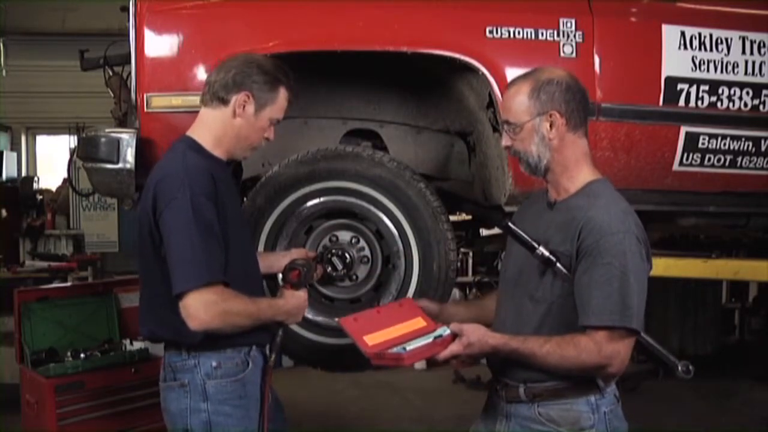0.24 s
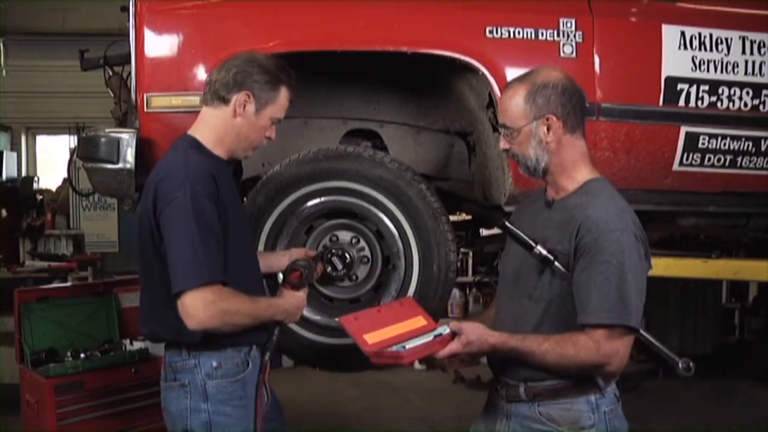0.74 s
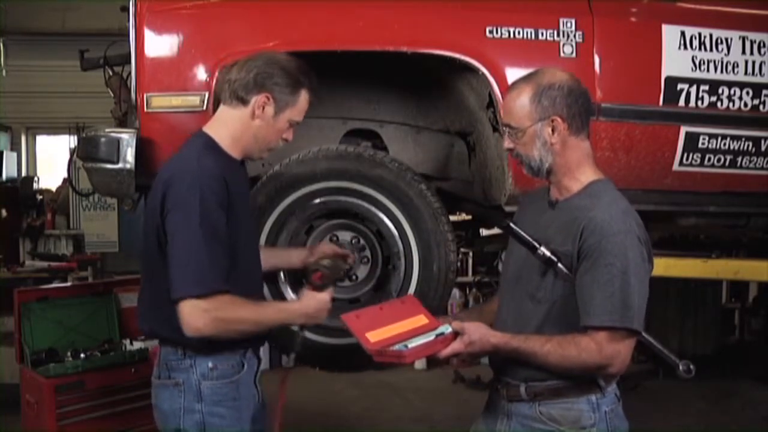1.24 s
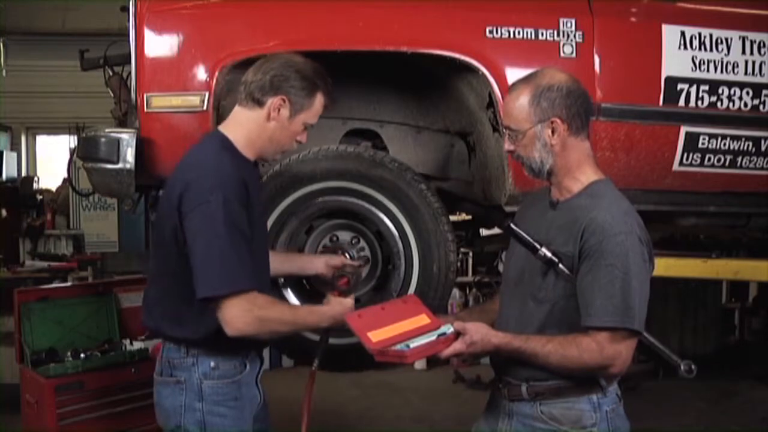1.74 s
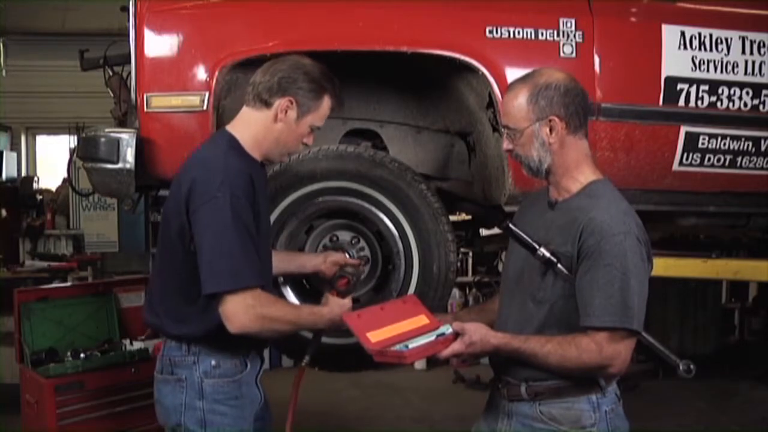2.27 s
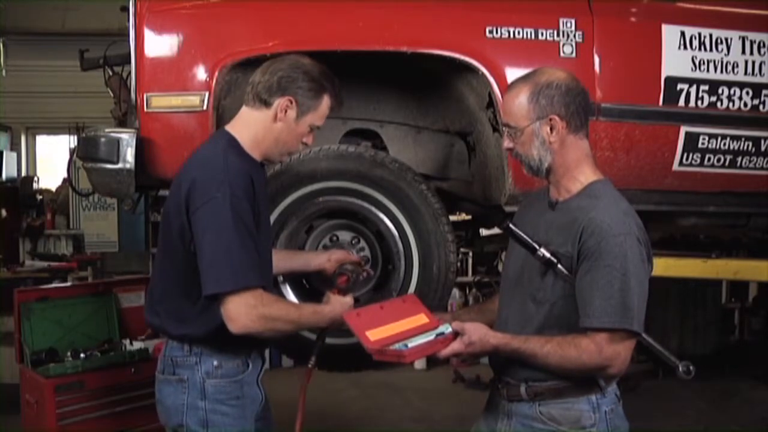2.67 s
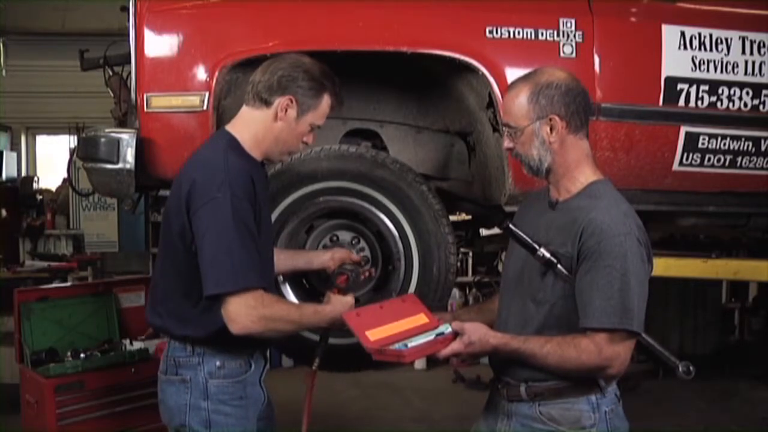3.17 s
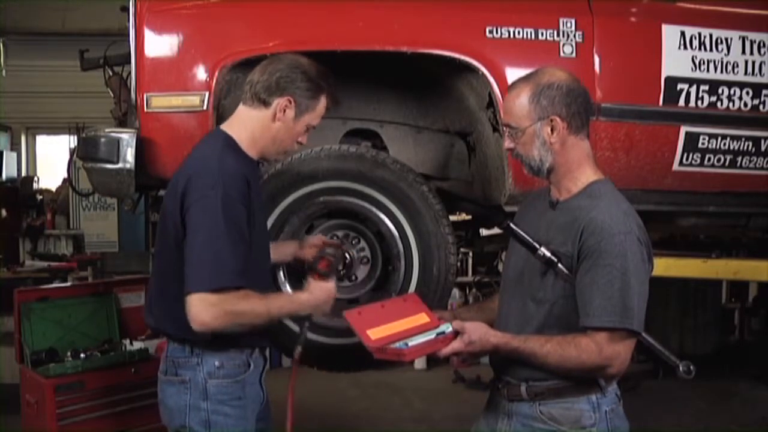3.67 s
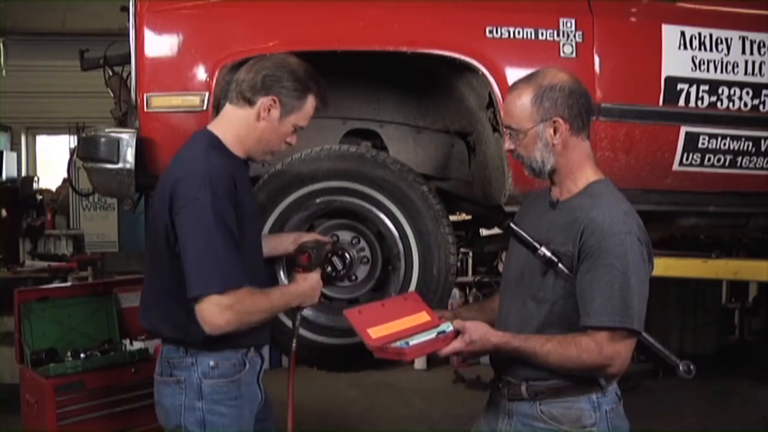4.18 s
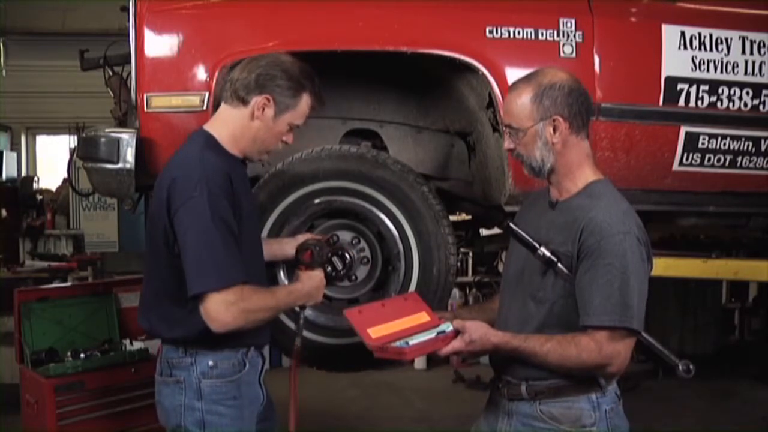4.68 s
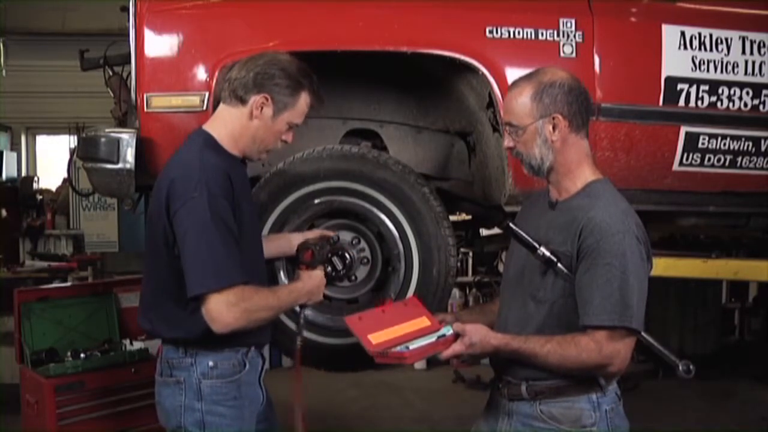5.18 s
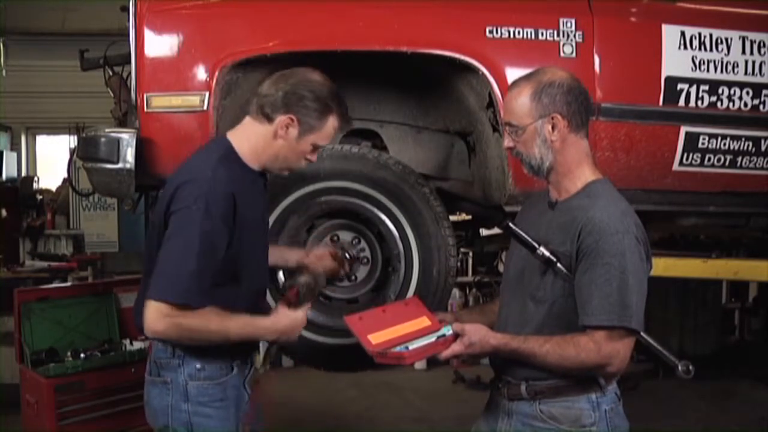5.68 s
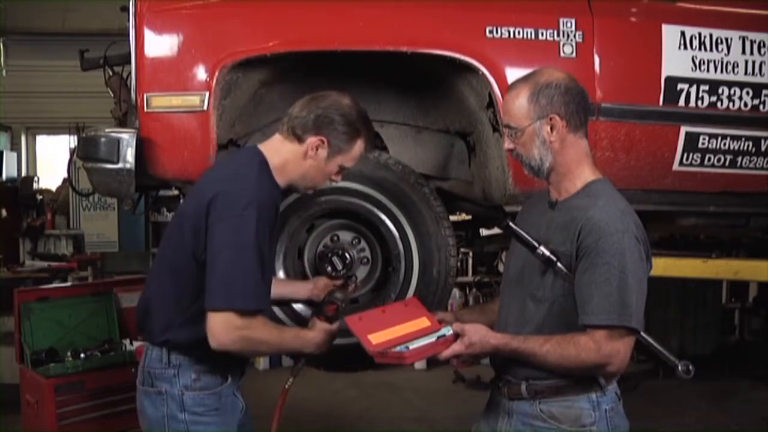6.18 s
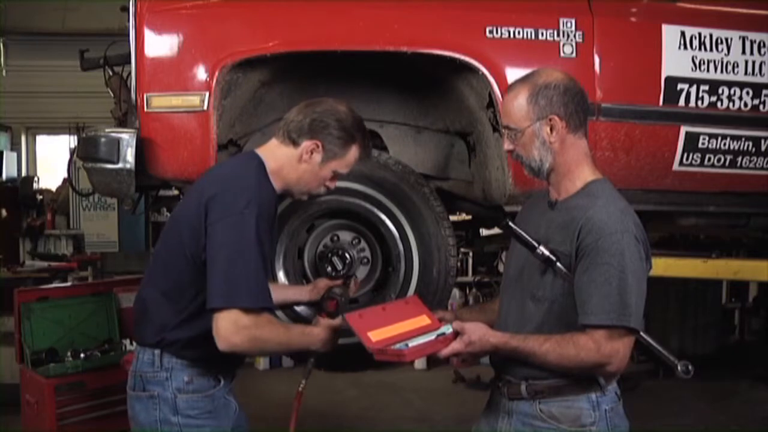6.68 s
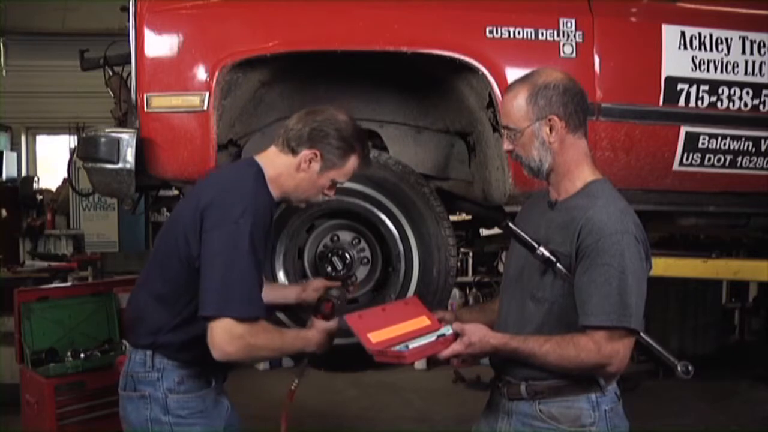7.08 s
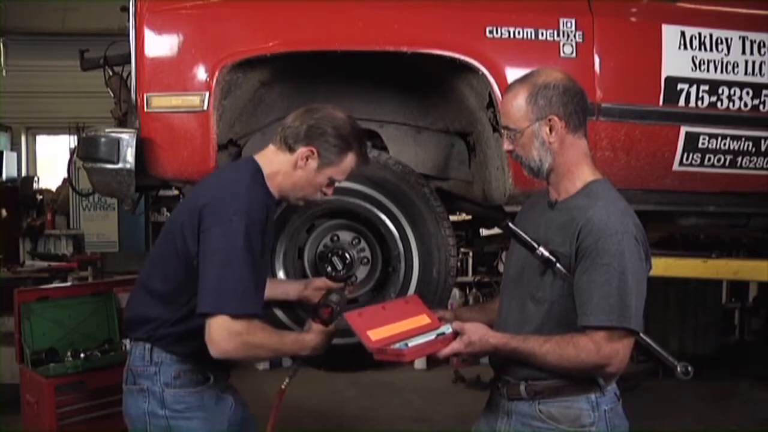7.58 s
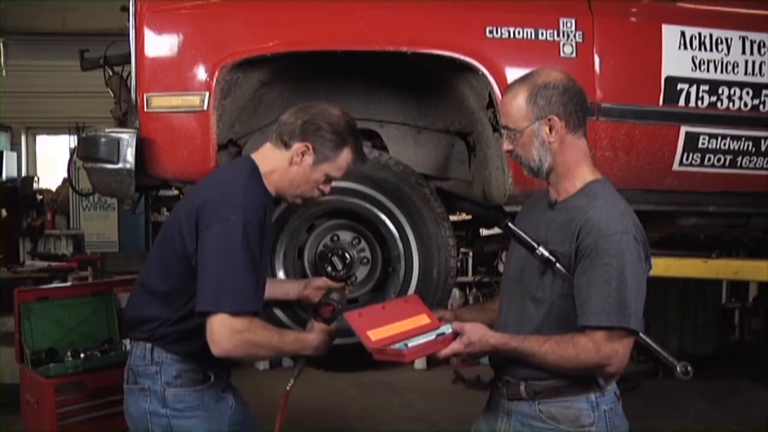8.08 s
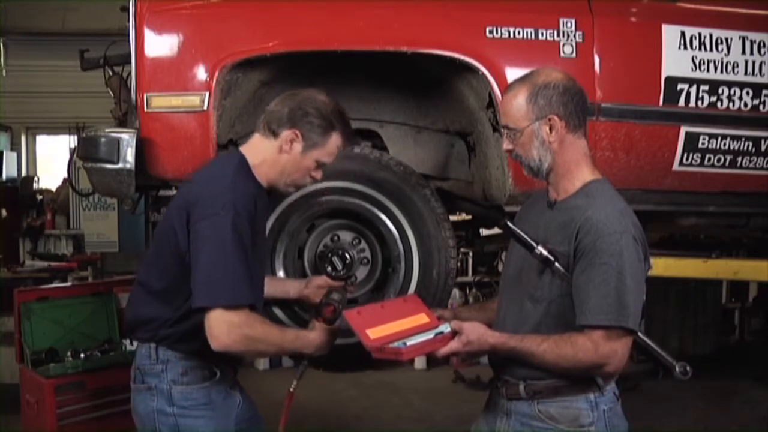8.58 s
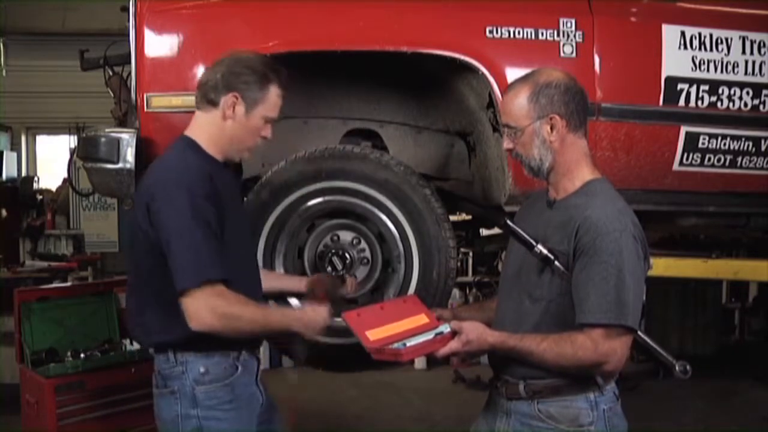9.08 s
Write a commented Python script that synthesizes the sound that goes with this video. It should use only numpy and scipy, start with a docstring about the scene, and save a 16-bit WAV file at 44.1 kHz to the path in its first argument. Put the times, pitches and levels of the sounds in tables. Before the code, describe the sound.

Close up in an echoing workshop, an air impact wrench is already hammering on a steel wheel, then stops with loose clanks. Two more loud bursts follow, each with buzzing motor puffs and hissing air, separated by socket knocks on nuts and rim. After a nearly silent pause, a longer, brighter and hissier burst rattles, then a few light clicks.

```python
"""Impact wrench on a steel wheel

An air impact wrench tightens nuts on a steel wheel in four bursts, in a workshop. In every stroke the vane
motor puffs faster, the clutch catches, and the hammer strikes the anvil: noise cracks over decaying metal modes.
Shaped noise is the exhaust's hiss. Around and between bursts the socket knocks on nuts and rim, the brake drum rings
faintly, a lamp hums as a sine, low noise trails some knocks, faint rustling follows, and the hall answers with
decaying noise."""
import sys
import numpy as np
from scipy import signal
from scipy.fft import rfft, irfft, next_fast_len
from scipy.io import wavfile
from scipy.ndimage import uniform_filter1d, minimum_filter1d

SR = 44100
rng = np.random.default_rng(int(sys.argv[2]) if len(sys.argv) > 2 else 0)


def dump(signal):
    """Clip the signal to [-1, 1] and save it as 16-bit WAV at the path in sys.argv[1]."""
    limited = np.clip(np.atleast_2d(signal).T, -1, 1)
    pcm = np.round(limited * 32767).astype(np.int16)
    wavfile.write(sys.argv[1], SR, pcm)


N = 411453
TIME = np.arange(N) / SR
RING = np.arange(SR // 2) / SR  # time axis of one struck ring, s


def amp(db):
    """Decibels to gain."""
    return 10 ** (np.asarray(db) / 20)


def unit(x):
    """Scales a signal to rms 1."""
    return x / np.sqrt(np.mean(x ** 2) + 1e-20)


def along(points, hz):
    """Reads a curve of (Hz, value) points on a log frequency axis."""
    point_hz, values = np.transpose(points)
    return np.interp(np.log(hz + 1), np.log(point_hz + 1), values)


def filtered(x, response):
    """Multiplies the spectrum of x by a complex response of frequency."""
    size = next_fast_len(N + 2 * SR)
    spectrum = rfft(x, size) * response(np.fft.rfftfreq(size, 1 / SR))
    return irfft(spectrum, size)[:N]


def noise(spectrum):
    """Coloured noise of rms 1; only the shape of the spectrum counts."""
    return unit(filtered(rng.standard_normal(N), lambda hz: amp(along(spectrum, hz))))


def add(track, s, piece):
    """Lays a piece into a track at a time in seconds."""
    part = track[max(round(s * SR), 0):][:len(piece)]
    part += piece[:len(part)]


def contact(t60, rise):
    """Envelope of a rattling contact: a quick rise, then chatter that dies."""
    t = np.arange(SR // 8) / SR
    chatter_db = np.repeat(rng.normal(0, 3, len(t) // 32 + 1), 32)[:len(t)]
    decay_db = -60 * t / np.clip(t60, .003, .2)
    return (1 - np.exp(-t / rise)) * amp(chatter_db + decay_db)


# Modes of the socket. Each row: frequency in Hz, level in dB, free decay t60 in seconds.
SOCKET_MODES = [(3215, 0, .12), (3693, -1, .13), (4425, -1, .1), (4795, -5, .09), (6245, -9, .12),
                (6575, -10, .14), (7370, -8, .09), (7620, -9, .09), (9000, -16, .08), (11650, -20, .05)]
# Modes of anvil and housing. Each row: frequency in Hz, level in dB, free decay t60 in seconds.
ANVIL_MODES = [(3798, -2, .18), (4675, -6, .08), (5190, -1, .14), (5475, -1, .12), (5700, -6, .14),
               (6120, -7, .17), (7210, -12, .13), (7882, -6, .12), (8150, -11, .09), (9318, -8, .09),
               (9620, -11, .08)]
# Modes of the wheel disc. Each row: frequency in Hz, level in dB, free decay t60 in seconds.
DISC_MODES = [(1371, -7, 0.39), (1388, -3, 0.076), (1467, -2, 0.11), (1790, -7, 0.02), (2030, -14.5, 0.22),
              (2210, -10.5, 0.12), (2580, -18.5, 0.22), (2670, -13.5, .13), (2650, -18.5, 0.068)]
# Modes of the wheel rim. Each row: frequency in Hz, level in dB, free decay t60 in seconds.
RIM_MODES = [(749, -14.5, 0.27), (938, -5, 0.31), (1047, -7.5, 0.26), (1065.5, -8.5, 0.13)]


def ringing(modes):
    """A body to strike: every blow starts each mode at a new strength; a grip adds its own decay."""
    sines = np.array([amp(db - 60 * RING / t60) * np.sin(2 * np.pi * hz * RING) for hz, db, t60 in modes])
    soft_start = 1 - np.exp(-RING / .0012)
    fade_out = np.sqrt(1 - RING / RING[-1])
    sines *= soft_start * fade_out

    def strike(grip_t60):
        """One blow: random strength and sign per mode, damped by the grip."""
        strengths = amp(rng.normal(0, 3, len(modes))) * rng.choice([-1, 1], len(modes))
        return strengths @ sines * amp(-60 * RING / max(grip_t60, .02))
    return strike


socket, anvil = ringing(SOCKET_MODES), ringing(ANVIL_MODES)
disc, rim = ringing(DISC_MODES), ringing(RIM_MODES)

# Trigger pulls. Each row: air on in seconds, air off in seconds, held hiss in dB, motor puffs in dB, spin-up before
# the blow in seconds, exhaust port in dB, clutch catch in dB, socket in dB, anvil in dB, sizzle over the crack in dB.
TRIGGER_PULLS = [(-.05, 0.784, -33.5, -28, 0.032, -9, -2, -4.5, -5.5, -4.5),
                 (2.15, 3.35, -32, -29, 0.034, -6, -7, 1, -6.5, -4.5),
                 (4.376, 5.225, -33.5, -28, .036, -10.5, -3, -10, -5, -8),
                 (7.39, 8.66, -30, -28.5, .031, -1, -12, 5, 5.5, 0.5)]


def trigger_pull(s):
    """The trigger pull that a moment belongs to."""
    return [row for row in TRIGGER_PULLS if row[0] < s][-1]


# Hammer strokes. Each row: time of the blow in seconds, blow level in dB, ring of the wheel in dB.
HAMMER_STROKES = [(.0014, -11.5, -40), (0.0577, -12, -23), (.107, -7.5, -18.5), (.177, -8.5, -19.5),
                  (0.248, -13.5, -18), (0.3118, -11, -25), (0.3671, -15, -23), (0.4345, -8.5, -19),
                  (0.5075, -11.5, -18), (0.5784, -10.5, -21), (0.6482, -14, -19.5), (0.7169, -7.5, -22.5),
                  (2.2255, -10.5, -24), (2.2754, -11.5, -19), (2.3308, -9.5, -34.5), (2.382, -10, -28.5),
                  (2.4318, -11, -21.5), (2.497, -9, -29.5), (2.5465, -8.5, -24.5), (2.616, -7, -20.5),
                  (2.6844, -7.5, -18), (2.7472, -10.5, -28), (2.812, -8, -22.5), (2.8832, -8, -23),
                  (2.9509, -8.5, -18.5), (3.022, -8, -19), (3.0933, -9, -19.5), (3.1608, -8.5, -22),
                  (3.232, -8, -20), (3.3046, -5.5, -20), (4.4416, -4, -33.5), (4.4911, -9, -22),
                  (4.559, -10.5, -19.5), (4.6284, -10.5, -22.5), (4.6964, -6, -20), (4.7495, -10.5, -21.5),
                  (4.8184, -6, -21.5), (4.8899, -5, -22), (4.964, -7, -20.5), (5.0345, -6.5, -28),
                  (5.1059, -8, -26), (5.1781, -3, -16), (7.4615, -12.5, -52), (7.5175, -14.5, -28),
                  (7.583, -17, -27), (7.634, -16.5, -31), (7.7003, -17, -38), (7.7682, -15.5, -25.5),
                  (7.8267, -15.5, -30), (7.8932, -13.5, -53.5), (7.958, -15.5, -40), (8.0247, -15, -30),
                  (8.0929, -18, -49), (8.1572, -13, -41.5), (8.2247, -14.5, -45.5), (8.2912, -16.5, -38),
                  (8.3572, -15, -37), (8.4239, -14, -51.5), (8.492, -14, -44), (8.558, -18, -42.5),
                  (8.6278, -15, -48.5)]
# Crack of bare metal contact. Each row: frequency in Hz, relative density in dB per Hz.
CRACK_SPECTRUM = [(200, -32), (600, -26), (1200, -2), (2500, -1.5), (4000, 0.5), (6000, -4.5), (9000, -20),
                  (12000, -19)]
# Sizzle, the top end of the crack. Each row: frequency in Hz, relative density in dB per Hz.
SIZZLE_SPECTRUM = [(4000, -18.5), (7500, -3.5), (9300, -2), (10300, -6.5), (12000, -5), (14000, -6),
                   (16000, -10.5)]
CLUTCH_LEAD_S = 0.019  # the clutch catches ahead of each blow
CLUTCH_SCATTER_DB = 1.5
CLUTCH_WHEEL_DB = -3.5  # how much the catch rings the wheel, over the blow
CATCH_TOOL_DB = -5.5  # how much the catch rings the tool, over a blow as loud
CATCH_T60_S, CATCH_RISE_S = 0.045, 0.0021  # the catch is short
BLOW_T60_S, BLOW_RISE_S = .11, 0.0024  # the blow builds up
CONTACT_DB = -11.5  # all contact noise against the ringing


def hammer():
    """Clutch catch, then hammer blow: each bursts into noise and rings socket, anvil and wheel."""
    crack, sizzle, rings = np.zeros((3, N))
    for s, blow_db, wheel_db in HAMMER_STROKES:
        clutch_db, socket_db, anvil_db, sizzle_db = trigger_pull(s)[-4:]
        catch_db = clutch_db + CLUTCH_SCATTER_DB * rng.normal()
        catch = (s - CLUTCH_LEAD_S, catch_db, wheel_db + CLUTCH_WHEEL_DB, CATCH_TOOL_DB, CATCH_T60_S, CATCH_RISE_S)
        blow = (s, blow_db, wheel_db, 0, BLOW_T60_S, BLOW_RISE_S)
        for at, level_db, steel_db, tool_db, t60, rise in (catch, blow):
            if at <= 0:
                continue
            tool = amp(socket_db) * socket(grip_t60=0.38) + amp(anvil_db) * anvil(grip_t60=0.76)
            steel = disc(grip_t60=0.36) + amp(-11.5) * rim(grip_t60=3)
            hit = amp(level_db) * contact(t60, rise)
            add(crack, at, hit)
            add(sizzle, at, amp(sizzle_db) * hit)
            add(rings, at, amp(level_db - 16.5 + tool_db) * tool + amp(steel_db) * steel)
    bursts = crack * noise(CRACK_SPECTRUM) + sizzle * noise(SIZZLE_SPECTRUM)
    return rings, amp(CONTACT_DB) * bursts


# Exhaust pipe resonances. Each row: frequency in Hz, width in Hz, level in dB.
PIPE_RESONANCES = [(165, 110, -2), (414, 384, -3.5), (626, 160, -2), (970, 60, -4), (1500, 360, 2.5)]
# Exhaust port, heard when the grip faces the room. Each row: frequency in Hz, width in Hz, level in dB.
PORT_RESONANCES = [(326.6, 110, 4), (849, 99, 6)]


def resonances(modes):
    """Response of a row of resonances that alternate in sign."""
    def response(f):
        return sum((-1) ** k * amp(db) * 1j * f * width / (hz * hz - f * f + 1j * f * width)
                   for k, (hz, width, db) in enumerate(modes))
    return response


# Turbulence of a vane's puff. Each row: frequency in Hz, relative density in dB per Hz.
PUFF_SPECTRUM = [(40, -2), (150, 0.5), (600, 6.5), (1500, -13), (3000, -44.5)]
VANE_START_HZ, VANE_TOP_HZ = 150.6, 321.7  # vanes passing the port, from stall to blow
RUN_ON_S = .005  # the rotor turns on this long after the blow
PUFF_TOP_HZ, EDGE_DB = 800, -5.5  # a puff is rounded above this; its sharp edge at full speed
TURBULENCE_DB = -50  # against the voiced puffs, before the motor's gain


def motor():
    """Each stroke the rotor gains speed until the hammer stalls it; each vane puffs air, sharper with speed."""
    puffs, port, speed = np.zeros((3, N))
    for s, *_ in HAMMER_STROKES:
        motor_db, spin_s, port_db = trigger_pull(s)[3:6]
        t = np.arange(round((spin_s + RUN_ON_S) * SR)) / SR
        vane_hz = VANE_TOP_HZ - (VANE_TOP_HZ - VANE_START_HZ) * (1 - t / t[-1]) ** 1.3
        # one impulse each time a whole vane has passed
        vanes = np.diff(np.floor(np.cumsum(vane_hz) / SR), prepend=-1)
        pulses = amp(motor_db + rng.normal(0, 1.5, len(t))) * vanes
        late = max(round((spin_s - s) * SR), 0)  # skips what falls before time zero
        add(puffs, s - spin_s, pulses[late:])
        add(port, s - spin_s, amp(port_db) * pulses[late:])
        add(speed, s - spin_s, (vane_hz / VANE_TOP_HZ)[late:])

    def voiced(weight):
        """Weighted puffs through pipe and port."""
        pipe_sound = filtered(weight * puffs, resonances(PIPE_RESONANCES))
        return pipe_sound + filtered(weight * port, resonances(PORT_RESONANCES))

    gusts = signal.lfilter([1], [1, -np.exp(-1 / (.003 * SR))], puffs)  # each puff dies over 3 ms
    turbulence = amp(TURBULENCE_DB) * gusts * noise(PUFF_SPECTRUM)
    body = filtered(voiced(0.66), lambda hz: 1 / (1 + 1j * hz / PUFF_TOP_HZ) ** 2)
    edge = filtered(voiced(speed ** 2), lambda hz: 1j * hz / (1j * hz + PUFF_TOP_HZ))
    return amp(46.5) * (body + amp(EDGE_DB) * edge + turbulence)


# Exhaust air. Each row: frequency in Hz, relative density in dB per Hz.
HISS_SPECTRUM = [(30, -8), (150, -2.5), (400, -10), (900, -9.5), (1850, -8.5), (5300, -8.5), (10200, -18.5),
                 (12100, -15), (16000, -27)]


def exhaust():
    """Air surges as the valve opens, hisses while the trigger is held and bleeds off after release."""
    flow = np.zeros(N)
    for on, off, hiss_db, *_ in TRIGGER_PULLS:
        held = np.clip(TIME - on, 0, 3)
        surge = 1 + 4 * np.exp(-held / 0.017)
        opening = np.clip(held / 0.04, 0, 1) ** 2 * surge
        bleed_db = -60 * np.clip(TIME - off, 0, 2) / 0.067
        flow += amp(hiss_db + bleed_db) * opening
    return flow * noise(HISS_SPECTRUM)


# Loose knocks of hammer, socket and nuts. Each row: time in seconds, level in dB, then over that level rim in dB,
# disc in dB, tool in dB and thud in dB, last the hand's damping as t60 in seconds.
LOOSE_KNOCKS = [(.7714, -9.5, -25, -25, -16, -34.5, 0.67), (.8028, -5.5, -37.5, -22, -16, -25, .4),
                (.8544, -17, -12.5, -3.5, -22, -20, 1.4), (.9166, -17.5, -32, -34, -12, -31, 0.25),
                (.9944, -31, -15, -11, -18, -33.5, 0.55), (1.0026, -25, -14, -24, -25, -27, .7),
                (1.4105, -13.5, -12.5, -3, -9, -13.5, 3.7), (1.481, -20, -15.5, -13, -27, -4, 1.4),
                (1.6854, -37, -9, -38, -18, -16, 0.74), (1.7309, -20, -21.5, -25, -25, -7, 0.86),
                (1.7674, -26.5, -14, -9.5, -16, -20, 1.4), (1.8298, -29, -2.5, 5.5, -6, -40.5, 0.35),
                (2.121, -43, -33, -35, -32, -15.5, 0.4), (2.1914, -15.5, -24.5, -8, -32, -18, .5),
                (3.3324, -15, -15, -12, -26, -35.5, .6), (3.3623, -8.5, -22.5, -15, -19, -38, 0.73),
                (3.4032, -13, -30, -19, -13, -30.5, .8), (3.5184, -26.5, -5, 1.5, -7, -36, 0.78),
                (3.8439, -13.5, -21, -10, -5.5, -16.5, .9), (3.9584, -34, -38, -4, -29, -32.5, 0.81),
                (3.9774, -17.5, -22, -12, -23, -17, 1.6), (4.0394, -39, -14.5, -57, -29, -8, .5),
                (4.0831, -27, -13.5, -19, -18, -26.5, 0.35), (4.1325, -31.5, -33, -34, -33, -29, 0.44),
                (4.153, -20, -8.5, 0.5, -19, -17, 0.29), (4.3455, -42, -21.5, -48, -40, -10, .45),
                (4.3899, -18.5, -11, -21, -28, -7, 0.41), (4.4089, -22, -35, -3, -8, -13, .5),
                (5.251, -22, -28, -19, -10, -18.5, 0.28), (5.2634, -19, -19.5, -11, -17, -23, .6),
                (5.3333, -14, -21, -11.5, -14.5, -31.5, 1), (5.4424, -25.5, -31, -18, -11, -36, 0.35),
                (5.4594, -36, -26, -23, -16, -35.5, .5), (5.4684, -38, -24, -14, -20, -15.5, 0.55),
                (5.4919, -23.5, -18, -29, -38, -39, 0.26), (5.7264, -44.5, -28, -21.5, -14, -27, .8),
                (5.7314, -47, -24, -36, -33, -36, .4), (5.7628, -40.5, -23, -27, -18, -35, 0.23),
                (6.0546, -28.5, -2, 2.5, -8.5, -31.5, 0.84), (6.117, -30, -9.5, -4, -16, -18, .8),
                (6.1569, -30, -6.5, -24, -17, -7, 1), (6.2023, -40, -3, -16, -30, -24, 0.46),
                (6.2208, -34, 0, -12, -13, -26, 0.46), (6.549, -56.5, -4, -17, -15, -5, 0.44),
                (6.5936, -52, -27.5, -17, -13, 1, 0.54), (6.6824, -62.5, -2, -11.5, -19, 14, .5),
                (6.9519, -50.5, -10, -7.5, -32, -21.5, 0.36), (7.0183, -53.5, -7, -6, -27, 0, 0.39),
                (7.0847, -57, -25, -17, -23, -18, 0.46), (7.1736, -44.5, -38, -27.5, -23.5, -30, 0.48),
                (7.4051, -24.5, 0, -8, -38, 1, 0.44), (7.422, -20, -17, -29, -28, 16, .5),
                (8.6594, -23, -25, -22, -4.5, -23, 0.43), (8.6951, -16, -19.5, -38, -18.5, -22.5, 0.63),
                (9.0597, -44.5, -24, -29, -31, -26, 0.4), (9.099, -39.5, -37.5, -37, -12, -39, .3),
                (9.1142, -49.5, -17, -18, -20, -29, 0.45), (9.163, -46.5, -23, -22, -17, -25, .5),
                (9.178, -22, -18, -1.5, -16, -42.5, 0.11), (9.1988, -28.5, -13, -6, -17, -34, 0.14)]
# Dull body of a knock. Each row: frequency in Hz, relative density in dB per Hz.
CLUNK_SPECTRUM = [(300, -9), (900, -2.5), (1600, -4.5), (2400, -2), (5000, -24)]
# Thud of tyre and hand. Each row: frequency in Hz, relative density in dB per Hz.
THUD_SPECTRUM = [(40, -19.5), (200, 11.5), (600, 2.5), (1500, -47)]
KNOCK_SIZZLE_DB, KNOCK_CLUNK_DB = -8.5, -1  # over the knock's level
KNOCK_ANVIL_DB = -9  # the anvil over the socket
RATTLE_T60_S = 0.049  # how long a knock chatters


def knocks():
    """Loose metal taps: chattering noise from crack to tyre thud, and hand-damped rings of tool and wheel."""
    crack, sizzle, clunk, thud, rings = np.zeros((5, N))
    for s, db, rim_db, disc_db, tool_db, thud_db, grip_t60 in LOOSE_KNOCKS:
        hit = amp(db) * contact(RATTLE_T60_S, rise=0.00013)
        add(crack, s, hit)
        add(sizzle, s, amp(KNOCK_SIZZLE_DB) * hit)
        add(clunk, s, amp(KNOCK_CLUNK_DB) * hit)
        add(thud, s, amp(thud_db) * hit)
        tool = amp(tool_db) * (socket(grip_t60) + amp(KNOCK_ANVIL_DB) * anvil(grip_t60))
        steel = amp(disc_db) * disc(grip_t60) + amp(rim_db) * rim(grip_t60)
        add(rings, s, amp(db) * (tool + steel))
    bursts = crack * noise(CRACK_SPECTRUM) + sizzle * noise(SIZZLE_SPECTRUM)
    bursts += clunk * noise(CLUNK_SPECTRUM) + thud * noise(THUD_SPECTRUM)
    return rings, amp(CONTACT_DB) * bursts


# Brake drum modes. Each row: frequency in Hz, relative level in dB, t60 in seconds.
DRUM_MODES = [(544, 0, 1.3), (1270, -5, 1.8), (1620, -12, 1)]


def drum(contacts):
    """Every contact shakes the brake drum a little; its modes ring on freely."""
    t = np.arange(2 * SR) / SR
    modes = sum(amp(db - 60 * t / t60) * np.sin(2 * np.pi * hz * t) for hz, db, t60 in DRUM_MODES)
    return amp(-61) * signal.fftconvolve(contacts, modes)[:N]


# Decay of the hall. Each row: frequency in Hz, t60 in seconds.
HALL_DECAY = [(100, 0.63), (500, 1), (2000, 0.87), (6000, 0.86), (10000, 0.52), (15000, 0.15)]


def hall(x):
    """Each frequency dies at its own speed; a fresh noise tail every quarter second varies the answer."""
    wet, step = np.zeros(N), SR // 4
    for start in range(0, N, step):
        hz, t, grid = signal.stft(rng.standard_normal(SR + SR // 2), SR, nperseg=256)
        decay = amp(-60 * t / along(HALL_DECAY, hz)[:, None])
        tail = signal.istft(grid * decay, SR, nperseg=256)[1]
        answer = signal.fftconvolve(x[start:start + step], tail / np.linalg.norm(tail))
        add(wet, start / SR + .012, answer)  # arrives 12 ms late
    return wet


# Low noise dying away after the knocks near 6.2 s, then faint rustling.
# Each row: time in seconds, low noise in dB, high noise in dB.
TRAIL_AND_RUSTLE_LEVELS = [(6.201, -36.5, -80), (6.35, -81, -90), (6.5, -92, -95), (6.61, -73, -76),
                           (6.76, -94.5, -86), (6.93, -95, -95), (7.0, -74.5, -76), (7.14, -91, -81),
                           (7.259, -81, -92), (7.301, -63, -74.5), (7.391, -67, -79)]
# Low noise. Each row: frequency in Hz, relative density in dB per Hz.
LOW_SPECTRUM = [(120, -44), (200, -9), (951, -5.5), (1170, -5), (1390, -6), (2130, -4.5), (12000, -41.5),
                (15600, -60), (22000, -120)]
# High noise. Each row: frequency in Hz, relative density in dB per Hz.
HIGH_SPECTRUM = [(1500, -39.5), (3500, 5.5), (5500, 2), (9000, -6.5), (16000, -34.5)]


def trail_and_rustle():
    """Low noise dies away after knocks, then faint rustles: two noise bands follow their own level curves."""
    s, low_db, high_db = np.transpose(TRAIL_AND_RUSTLE_LEVELS)
    low = amp(np.interp(TIME, s, low_db, -120, -120)) * noise(LOW_SPECTRUM)
    high = amp(np.interp(TIME, s, high_db, -120, -120)) * noise(HIGH_SPECTRUM)
    return low + high


# Still air and steady hiss. Each row: frequency in Hz, relative density in dB per Hz.
AIR_SPECTRUM = [(15, -51), (25, -18), (123, -5), (170, -13.5), (293, -8), (416, -16), (840, -12.5),
                (1440, -32), (1560, -24.5), (6000, -34.5), (12500, -33), (16000, -39)]
HUM_HZ = 120.2


def room_tone():
    """Steady noise of still air under a lamp's mains hum, a single sine."""
    return amp(-73.5) * noise(AIR_SPECTRUM) + amp(-73.0) * np.sin(2 * np.pi * HUM_HZ * TIME)


def scene():
    """The tool close by, the hall behind it; the hall answers the ringing more weakly than the noises."""
    hammer_rings, hammer_contacts = hammer()
    knock_rings, knock_contacts = knocks()
    rings = hammer_rings + knock_rings
    contacts = hammer_contacts + knock_contacts
    noises = contacts + motor() + exhaust()
    near = rings + drum(contacts) + noises
    far = amp(-14.0) * hall(noises + amp(-7) * rings)
    return (near + far + trail_and_rustle() + room_tone())[None]


BASS_HZ, TOP_HZ = 60, 15900  # bass roll-off and band limit


def record(dry):
    """The microphone rolls off the bass, a limiter holds the peaks, nothing passes the band limit."""
    x = filtered(dry[0], lambda hz: (1j * hz / (1j * hz + BASS_HZ)) ** 2)
    needed = np.minimum(1, 0.37 / (np.abs(x) + 1e-9))
    # the gain dips around each peak, on both sides, then is smoothed; sizes in samples
    gain = uniform_filter1d(minimum_filter1d(needed, size=265), size=131)
    return filtered(x * gain, lambda hz: hz < TOP_HZ)[None]


dry = scene()
out = record(dry)
dump(out)
```